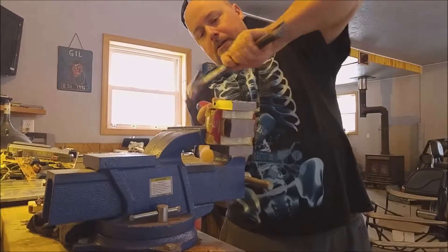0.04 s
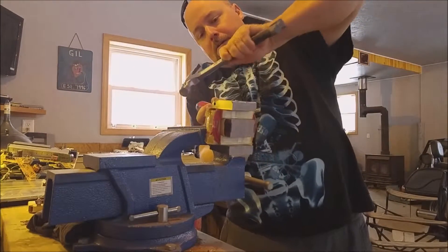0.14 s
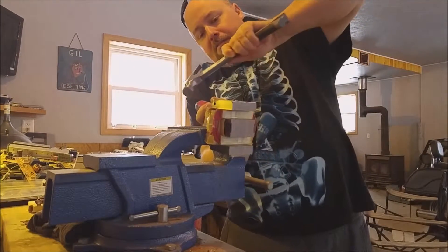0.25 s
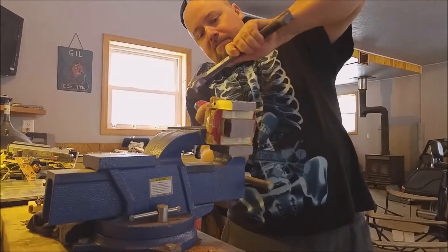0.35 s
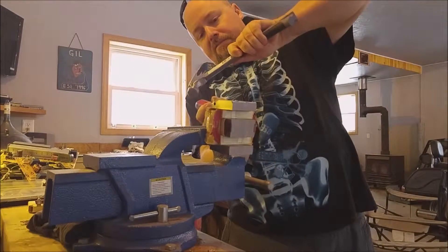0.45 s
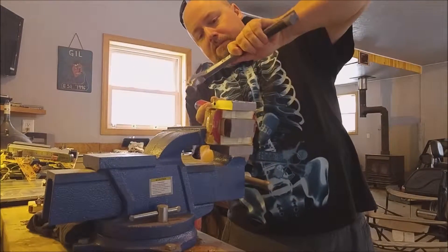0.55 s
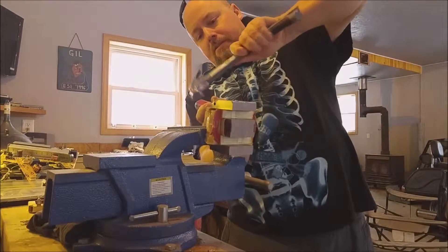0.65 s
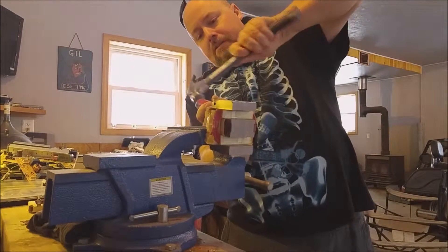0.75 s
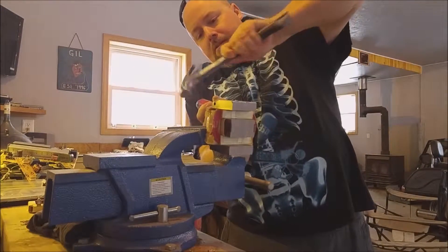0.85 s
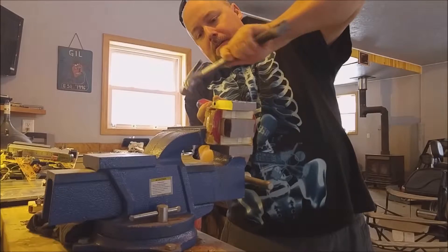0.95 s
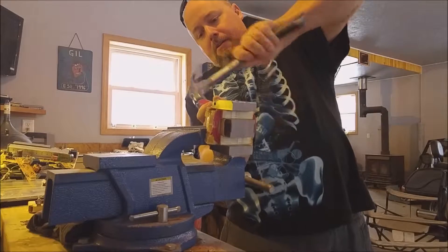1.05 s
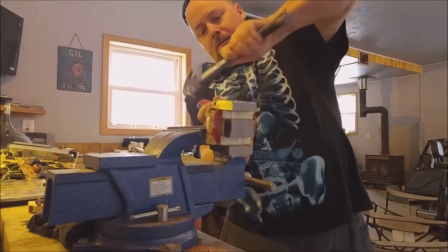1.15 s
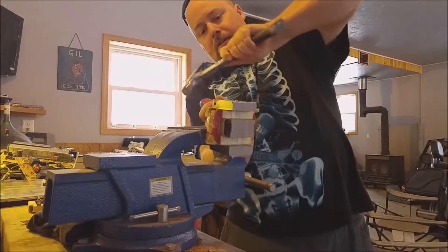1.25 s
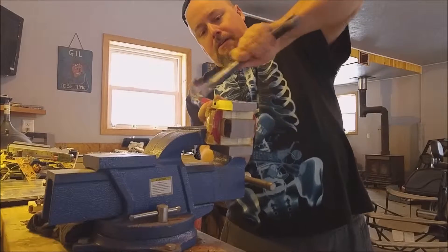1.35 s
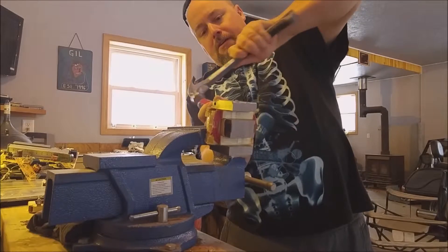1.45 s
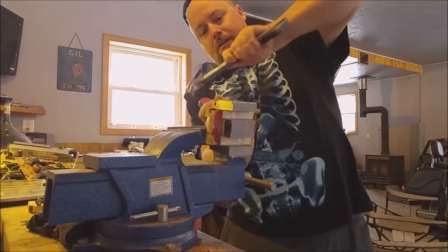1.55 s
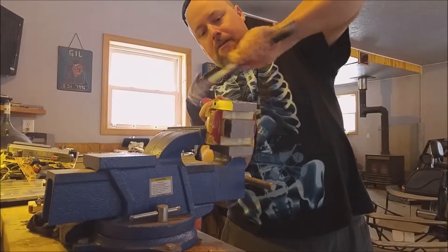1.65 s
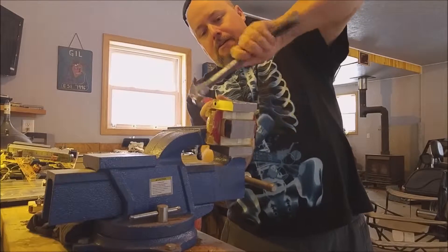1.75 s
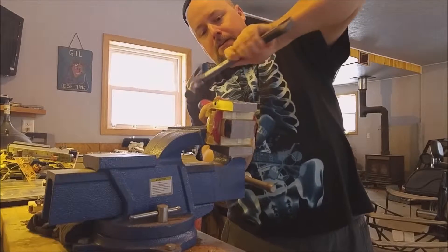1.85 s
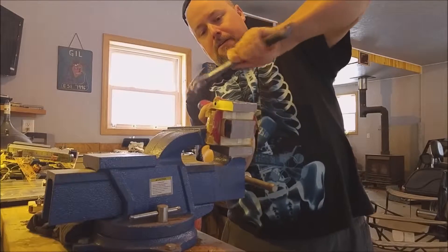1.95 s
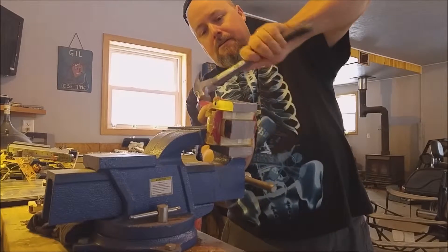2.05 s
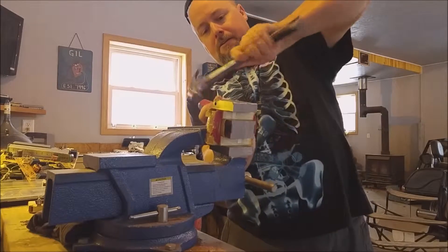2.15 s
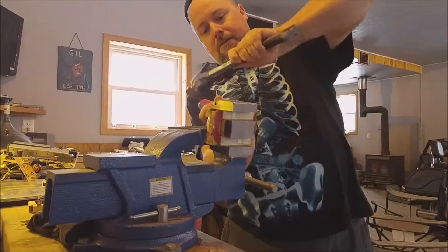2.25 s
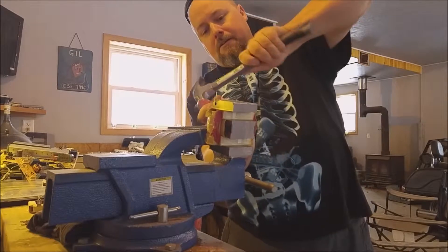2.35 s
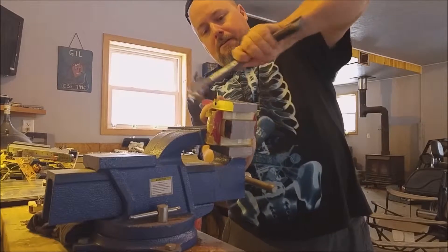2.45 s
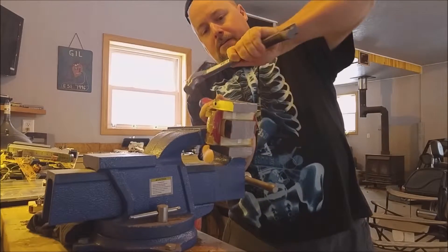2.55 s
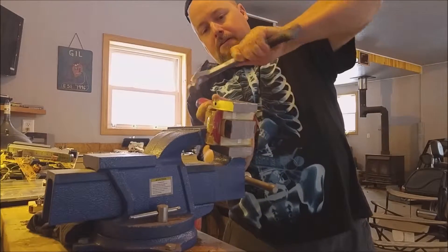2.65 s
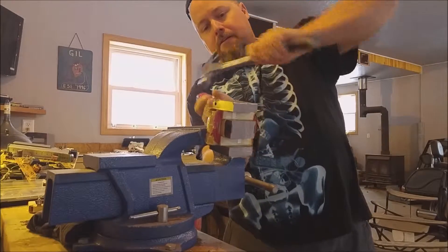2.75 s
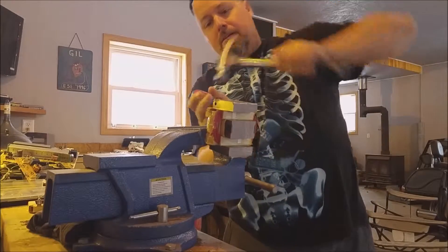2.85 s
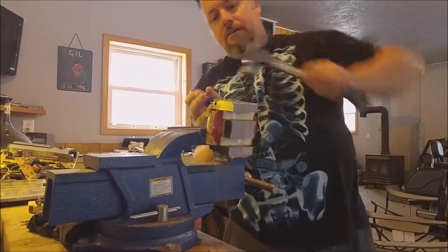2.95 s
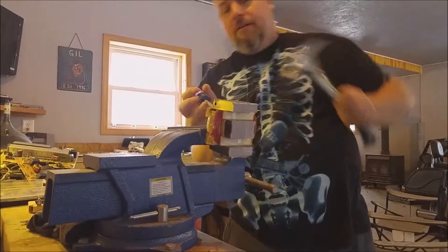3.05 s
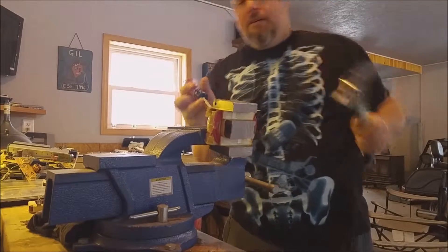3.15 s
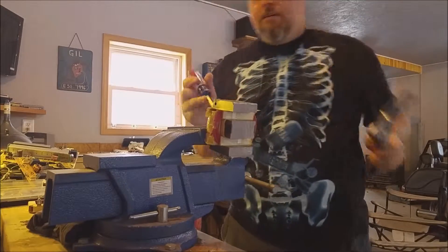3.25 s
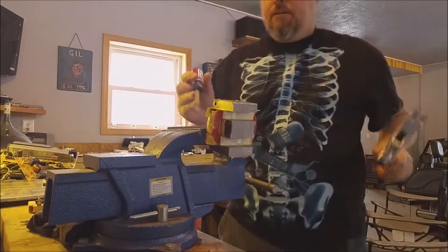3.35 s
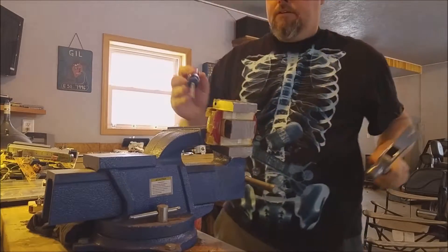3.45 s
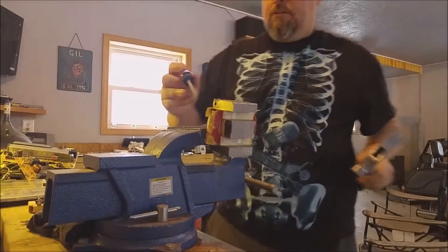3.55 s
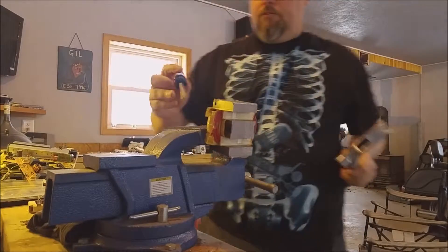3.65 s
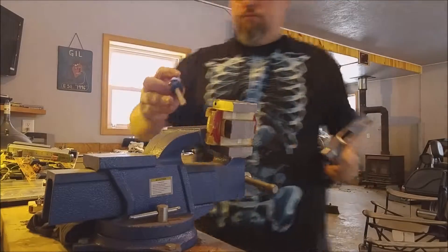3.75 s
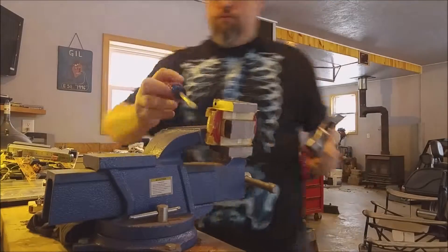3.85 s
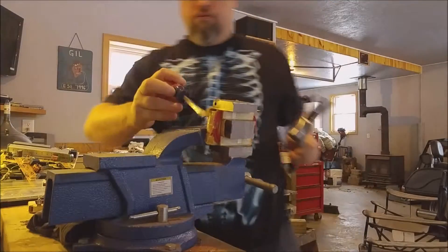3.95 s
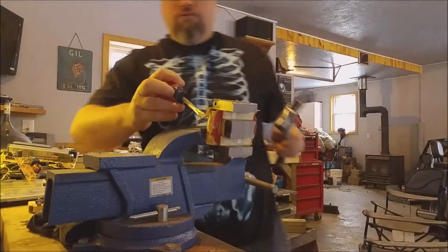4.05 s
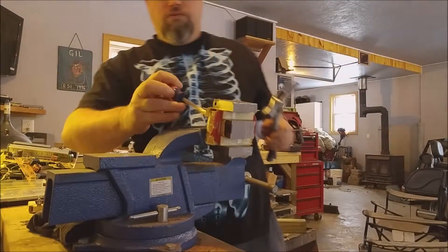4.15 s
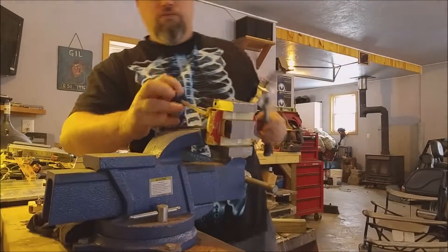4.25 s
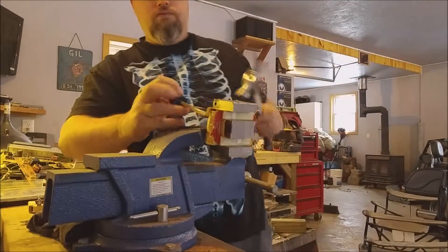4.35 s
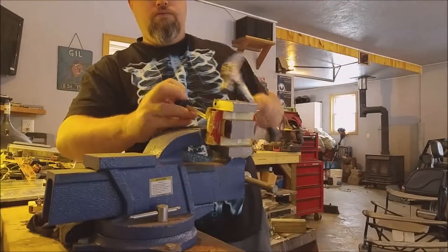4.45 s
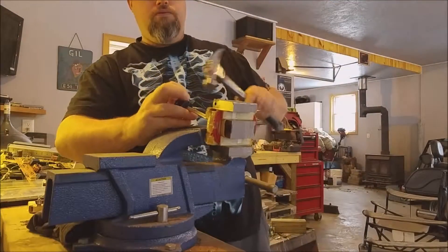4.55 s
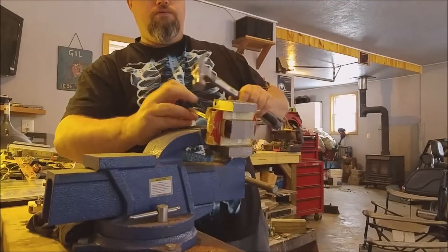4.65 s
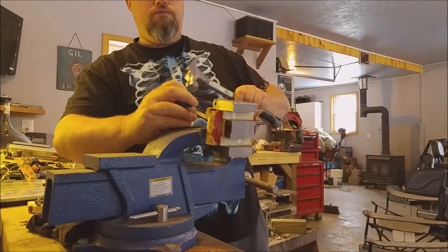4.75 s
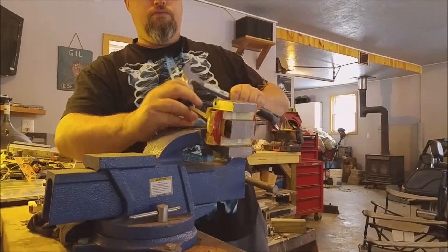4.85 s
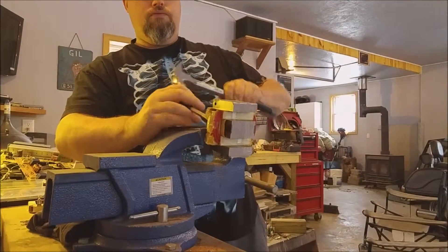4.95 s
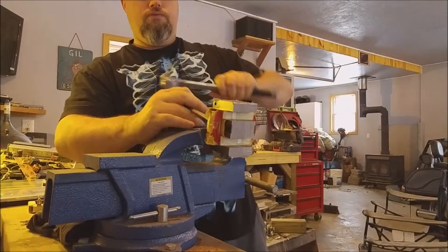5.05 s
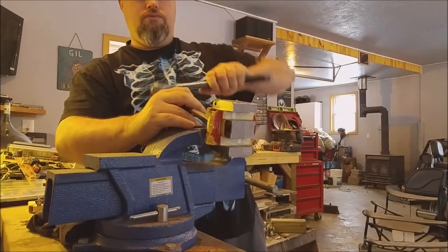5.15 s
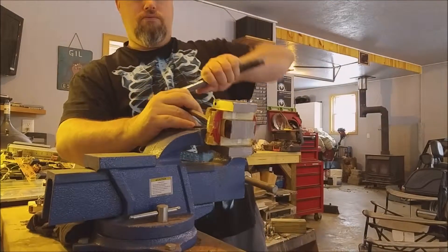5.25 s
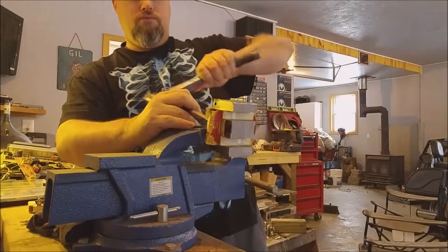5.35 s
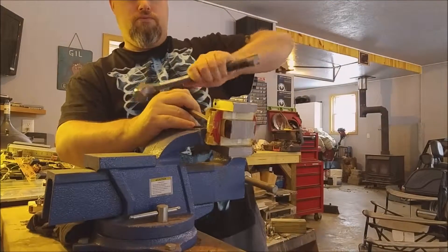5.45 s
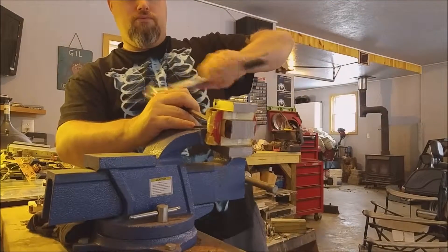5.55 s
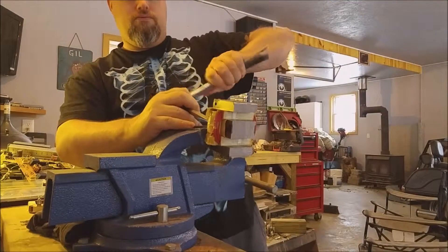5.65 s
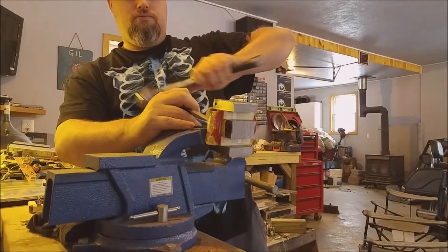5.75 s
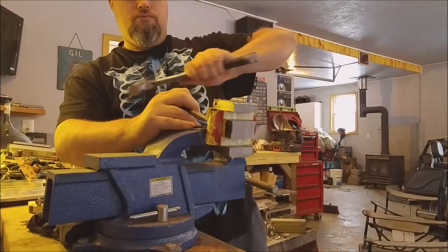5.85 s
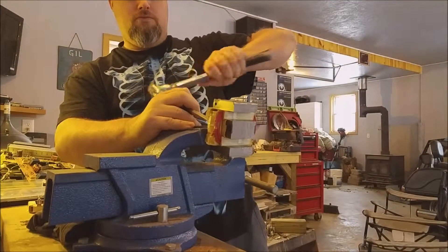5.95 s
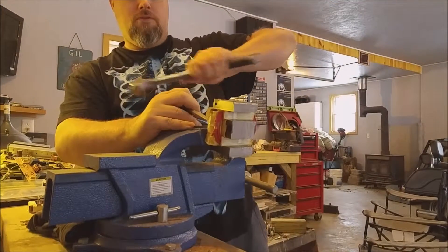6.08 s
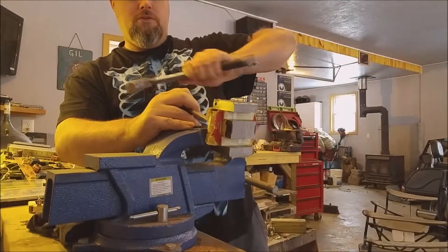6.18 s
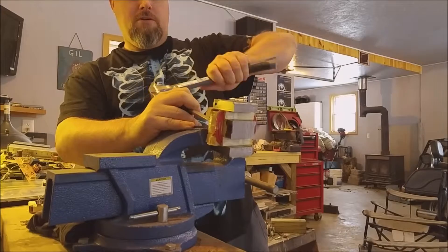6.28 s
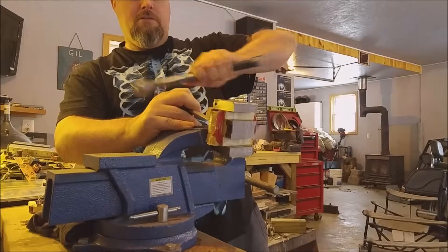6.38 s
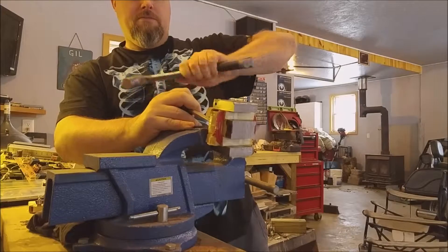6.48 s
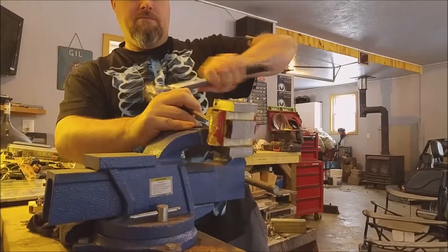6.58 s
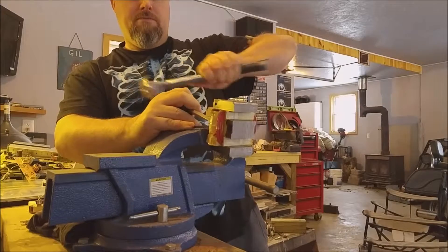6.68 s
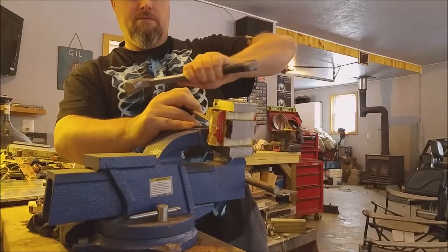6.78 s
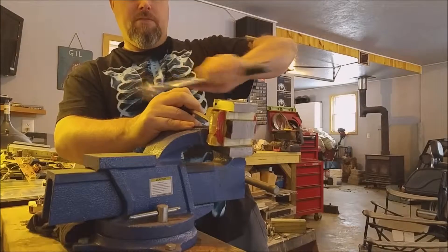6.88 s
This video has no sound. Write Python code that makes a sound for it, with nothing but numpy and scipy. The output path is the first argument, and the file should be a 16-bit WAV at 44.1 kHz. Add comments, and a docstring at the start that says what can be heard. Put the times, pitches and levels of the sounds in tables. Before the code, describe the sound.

A hammer strikes a screwdriver against clamped steel in two runs of sharp, ringing blows, echoing in a workshop.

```python
"""A hammer drives a screwdriver against a coil in a steel core, clamped in a vise on a wooden bench.
Each blow cracks, rings the steel, thumps the bench and fills the workshop; the hammer often bounces once.
Between two runs of blows the worker steps round the vise, and the blade clicks into a new place.
Rings are fading sine waves; cracks, clicks and echoes are fading noise. Faint air and hum lie behind."""
import sys
import numpy as np
from scipy import signal
from scipy.fft import rfft, irfft
from scipy.io import wavfile
from scipy.ndimage import uniform_filter1d

SR = 44100
rng = np.random.default_rng(int(sys.argv[2]) if len(sys.argv) > 2 else 0)


def to_wav(s):
    """Save 16-bit WAV."""
    ch = np.atleast_2d(s).T  # columns
    pcm = np.round(np.clip(ch, -1, 1) * 32767)  # PCM
    wavfile.write(sys.argv[1], SR, pcm.astype(np.int16))


N = 305172
T = np.arange(SR) / SR  # one second of time
HZ = np.fft.rfftfreq(SR, 1 / SR)  # the frequencies in that second, 1 Hz apart

# hammer blows: t/s, force/dB, bass thump/dB, wooden knock/dB, treble crack/dB, ring f/Hz, ring level/dB
BLOWS = [(0.056, -6, -1, 6, -5, 654, -18), (0.893, -7.5, 5.5, 7, -4.5, 1223, -11),
         (1.22, -1, 1.5, 3, -2, 2570, -28), (1.554, -3.5, 0.5, 3.5, -6.5, 1205, -24),
         (1.873, -3.5, 1.5, 3, -2.5, 1186, -39), (2.21, -4.5, 2, 2.5, -6.5, 654, -26),
         (2.537, -4.5, 0, 2.5, -4.5, 663, -24), (5.776, -7.5, 2.5, 2, 6.5, 656, -10),
         (6.143, -6, 5, 1.5, 2.5, 870, -19), (6.475, -4.5, 5, 2, 2, 689, -19.5),
         (6.798, -5.5, 6, 4, -4, 666, -20)]
# how long the room echoes (t60 is the time to fade by 60 dB): f/Hz, t60/s
ROOM_T60 = [(70, 0.78), (200, 0.54), (400, .66), (650, .76), (1100, 0.78), (3000, 0.72), (7000, 0.63),
            (14000, 0.35)]
# how alike left and right are in the direct sound: f/Hz, likeness/0-1
NEAR_SAME = [(100, .85), (300, 0.75), (600, 0.4), (1100, .15), (7000, 0.1)]
# how alike they are in the room's sound: f/Hz, likeness/0-1
ROOM_SAME = [(80, .9), (300, .78), (600, 0.22), (1100, 0.05), (7000, 0.05)]
# noise that is equally strong at every pitch: f/Hz, level/dB
WHITE = [(20, 0), (20000, 0)]


def hammer():
    """Each blow snaps, clanks the stacked core and rings its steel; vise, bench and room answer."""
    # tone colour of the clank: f/Hz, level/dB
    clank_colour = [(35, -45.5), (60, -24), (176, -19), (354, -11.5), (540, -12.5), (682, -9), (946, -7),
                    (1060, -8), (1340, -16.5), (1620, -9.5), (1820, -16), (2520, -20.5), (3420, -26),
                    (8320, -19.5), (16000, -37.5)]
    # how long the clank lasts: f/Hz, t60/s
    clank_t60 = [(100, 0.23), (350, 0.18), (1000, 0.14), (2700, 0.049), (7000, 0.09), (14000, 0.076)]
    # tones of the steel core: f/Hz, level/dB, t60/s
    steel_tones = [(656.4, -10, 0.13), (860, -17.5, 0.033), (1079, -9, 0.16), (1191, 4, 0.043),
                   (1560, -1.5, 0.066), (2576, -26, 0.43), (3390, -24.5, 0.31), (6220, -6.5, 0.02),
                   (7330, -12, 0.078), (8200, -18.5, 0.13)]
    # tones of the heavy vise, which is slow to get moving: f/Hz, level/dB, t60/s
    vise_tones = [(165.7, -12, .15), (265, -6, 0.15), (332, -6, .1), (387.6, 2.5, 0.12)]
    out = np.zeros((2, N))
    for s, force_db, thump_db, knock_db, crack_db, _, _ in BLOWS:
        clank = fade(noise(clank_colour, NEAR_SAME, SR), clank_t60) * rise(0.00011)
        snap = amp(-20) * contact(t60=0.042) + amp(-12.5) * contact(t60=0.029)
        blow = amp(-14) * clank + snap * pan(2.2)
        blow += amp(-16.5) * ring(steel_tones, detune=0.0036) * rise(0.00088)
        blow += amp(-17) * ring(vise_tones, detune=0.018) * slow_rise(0.009)
        blow += amp(-31.5) * bench()
        blow += amp(-24.5) * workshop() * pan(0.51)
        blow += amp(-46.5) * jolt()
        add(out, s, amp(force_db) * tint(blow, [thump_db, knock_db, 0, 0, crack_db]))
    # an earlier blow still hangs in the room
    add(out, -0.3, amp(-20) * tint(workshop(), [-3.5, -1, -5.5, -6.5, -14]))
    return out


def contact(t60):
    """Steel meets steel with a bright snap."""
    # tone colour of the snap: f/Hz, level/dB
    snap_colour = [(180, -53.5), (300, -27), (1230, -19.5), (2030, -23.5), (4670, -6.5), (5430, -9.5),
                   (5900, 2.5), (6620, 0.5), (7080, 0.5), (8640, -6), (10200, -11), (15200, -24.5),
                   (16000, -38)]
    return ragged(noise(snap_colour, NEAR_SAME, SR), spacing_hz=410) * dying(t60) * rise(0.00012)


def core_and_shaft(pair_ratio=0.905, lower_db=-3.5, smear_hz=60):
    """The core rings with two close tones where the blade bites; the shaft pings if hit off centre."""
    # pings of the screwdriver shaft: t/s, f/Hz, level/dB, t60/s
    pings = [(0.893, 6000, -31, 0.041), (1.241, 8070, -27.5, 0.29), (1.555, 6380, -17.5, 0.02),
             (1.871, 6160, -30.5, 0.072), (5.776, 7300, -33, 0.025)]
    core, shaft = np.zeros((2, 2, N))
    for s, force_db, *_, hz, ring_db in BLOWS:
        t60 = 0.16 * (hz / 1000) ** -0.46  # higher rings die sooner
        lower_hz = hz * pair_ratio
        pair = ring([(hz, 0, t60), (lower_hz, lower_db, t60)], detune=0) * rise(0.00031)
        # the loose coil smears the ring in the room
        smear = resonant([(hz, smear_hz, 0), (lower_hz, smear_hz, lower_db)]) * dying(0.85) * rise(0.015)
        add(core, s, amp(force_db + ring_db) * (pair + amp(-12.5) * smear))
    for s, *tone in pings:
        add(shaft, s, ring([tone], detune=0) * rise(0.0007))
    return core + shaft + amp(-3) * echo(shaft)


def bench(lag_s=0.025, rebound_s=0.09):
    """The bench bends a moment after the blow, then rocks back."""
    # tones of the bench and floor: f/Hz, level/dB, t60/s
    bench_tones = [(57.3, -4, 0.27), (68.7, -15.5, 0.28), (87.5, 7.5, 0.22), (128.3, -11.5, .3)]
    thump = ring(bench_tones, detune=0.02) * slow_rise(lag_s) * pan(4)
    sway = np.sin(2 * np.pi * 68 * (T - rebound_s)) * np.exp(-((T - rebound_s - 0.012) / 0.015) ** 2)
    return thump + amp(3.5) * sway


def jolt():
    """A deep bump follows each blow, mostly on the left."""
    colour = [(15, -41.5), (38, 5), (60, 4), (110, -8.5), (300, -49), (1000, -87.5)]
    return noise(colour, [(30, 0.3), (100, 0.46)], SR) * dying(0.6) * slow_rise(0.015) * pan(10)


def thuds(second_run_s=5, drop_db_per_blow=9):
    """From its new place the blade drives squarely into the bench; thuds weaken as the core settles."""
    # tones of the bench top: f/Hz, level/dB, t60/s
    top_tones = [(56, 3, 0.12), (112, 5, 0.077)]
    out = np.zeros((2, N))
    for k, s in enumerate(row[0] for row in BLOWS if row[0] > second_run_s):
        dip = ring(top_tones, detune=0.032, apart_hz=90) * rise(0.0043) * pan(10)
        add(out, s, amp(-19 - k * drop_db_per_blow) * dip)
    return out


def bounces():
    """The hammer head lands a second time: a thin, bright chink that the room soon dulls."""
    # bounces on the handle: t/s, level/dB
    landings = [(0.1333, -40), (1.5844, -20.5), (1.9083, -24.5), (2.2416, -24.5), (2.5712, -27.5),
                (6.51, -26.5), (6.83, -25)]
    # pitches that stand out in a bounce: f/Hz, width/Hz, level/dB
    handle_peaks = [(6960, 2600, -12.5), (8400, 310, 3.5), (11500, 600, -18.5), (13180, 700, -9)]
    out = np.zeros((2, N))
    for s, db in landings:
        chink = resonant(handle_peaks) * dying(0.073) * rise(0.00054)
        tail = fade(resonant(handle_peaks), [(7000, 0.45), (9000, 0.35), (13000, 0.18)]) * rise(0.004)
        add(out, s, amp(db - 2.5) * (chink + amp(-15.5) * tail) * pan(0.75))
    return out


def blade():
    """The blade finds its place with small clicks that nudge the bench, and skids with a gritty rasp."""
    # clicks of the blade: t/s, level/dB
    clicks = [(4.375, -18.5), (4.3973, -24.5), (4.653, -17.5), (4.6723, -24), (4.6829, -31), (4.689, -34)]
    # pitches that stand out in a click: f/Hz, width/Hz, level/dB
    blade_peaks = [(720, 160, -13), (1207, 39, -6.5), (4400, 1200, -14), (6420, 440, -7), (7180, 260, -2),
                   (8000, 150, 4), (8680, 490, -2.5), (11400, 2500, -20), (14900, 1400, -33)]
    # skids over the metal: t/s, level/dB, swell time/s
    skids = [(0.14, -44, 0.015), (1.239, -28, .008), (1.259, -24.5, 0.011), (4.369, -45, .005),
             (4.434, -45, 0.042), (4.672, -51, 0.022), (5.786, -27, 0.0089)]
    nudge_colour = [(40, -10), (110, 3), (220, -2), (400, -4), (900, -30), (3000, -70)]
    rasp_colour = [(500, -7), (2500, 2.5), (4800, 4), (7500, 5), (9000, -1.5), (11000, 0.5),
                   (16000, -22.5)]
    tick_then_ring = amp(2.5) * dying(0.011) + amp(-15) * dying(0.06)
    out = np.zeros((2, N))
    for s, db in clicks:
        click = resonant(blade_peaks) * tick_then_ring * rise(0.0005)
        add(out, s, amp(db) * (click * pan(5) + amp(-36) * workshop()))
        nudge = noise(nudge_colour, ROOM_SAME, SR) * dying(0.5) * rise(0.015)
        add(out, s, amp(db - 42) * nudge)
    for s, db, swell_s in skids:
        grit = unit(np.exp(1.5 * uniform_filter1d(rng.standard_normal(SR), 20)))
        rasp = noise(rasp_colour, NEAR_SAME, SR)
        swell = np.exp(-((T - 0.5) / swell_s) ** 2)
        add(out, s - 0.5, amp(db) * rasp * grit * swell * pan(2))
    return out + amp(-10) * echo(out)


def workshop():
    """The room answers a sharp sound with a wash of noise in which steel tones stand out."""
    # tone colour of the wash: f/Hz, level/dB
    wash_colour = [(40, -15.5), (75, -0.5), (190, -6.5), (350, 1.5), (440, -1.5), (515, -11.5), (640, -4.5),
                   (1150, -5.5), (2000, -17.5), (4200, -19), (7000, -10.5), (9000, -17), (11500, -21),
                   (16000, -38.5)]
    # steel tones that hang in the room: f/Hz, width/Hz, lift/dB
    held_tones = [(627, 26, 6.5), (1130, 19, 0), (1704, 42, 4), (2530, 55, 1), (2791, 30, 4.5),
                  (3500, 25, 3), (6530, 60, 3), (7000, 140, 3), (8500, 180, 5.5)]
    lift_db = sum(db / (1 + ((HZ - hz) / width) ** 2) for hz, width, db in held_tones)
    wash = irfft(rfft(noise(wash_colour, ROOM_SAME, SR)) * amp(lift_db), SR)
    return fade(ragged(wash, spacing_hz=90), ROOM_T60) * rise(0.016)


def echo(x):
    """The room's many reflections blur any sound into a fading tail."""
    room = fade(noise(WHITE, ROOM_SAME, SR), ROOM_T60) * rise(0.037)
    return signal.fftconvolve(x, room / np.linalg.norm(room[0]), axes=1)[:, :N]


def steps(loudest_s=4.25, swell_s=0.65):
    """The floor gives one low, swelling rumble as the worker steps round the vise."""
    swell = np.exp(-((np.arange(N) / SR - loudest_s) / swell_s) ** 2)
    rumble = noise([(18, -25), (50, 0), (120, -6), (250, -14), (500, -35), (1500, -80)], ROOM_SAME, N)
    return amp(-71) * swell * rumble * pan(2)


def background(tick_s=0.001):
    """Room air, a faint hum, and a short run of tiny electrical ticks at an even pace."""
    # tone colour of the air: f/Hz, level/dB
    air_colour = [(18, -29.5), (45, -1), (90, -7), (140, -11), (290, -19), (415, -9), (510, -24),
                  (650, -14), (1200, -21), (2400, -26.5), (4200, -24), (8300, -19.5), (10500, -28),
                  (16000, -36)]
    # tones of the hum: f/Hz, level/dB
    hum_tones = [(53.8, -93.5), (419.9, -83), (608.3, -90)]
    t = np.arange(N) / SR
    out = amp(-73.3) * noise(air_colour, ROOM_SAME, N) * pan(15)
    for hz, db in hum_tones:
        waver = np.cumsum(rng.standard_normal(N)) * 0.0043
        out += amp(db) * np.sqrt(2) * np.sin(2 * np.pi * hz * t + waver)
    for s in np.arange(2.9615, 3.6, 0.1024):
        tick = noise([(4000, -30), (6500, 0), (10000, -3), (16000, -13)], [(100, 0.8), (9000, 0.8)], 1024)
        add(out, s, amp(-55) * tick * np.exp(-T[:1024] / tick_s))
    return out


def ring(tones, detune, apart_hz=600):
    """A struck object's fading tones; the higher ones are more out of step between left and right."""
    out = np.zeros((2, SR))
    for hz, db, t60 in tones:
        mistune, offset = rng.standard_normal(2)
        phase = np.array([[0.5], [-0.5]]) * offset * min(hz / apart_hz, np.pi)
        out += amp(db) * dying(t60) * np.sin(2 * np.pi * hz * (1 + detune * mistune) * T + phase)
    return out


def noise(colour, same, size):
    """Stereo noise with a tone colour (f/Hz, level/dB) and a left-right likeness (f/Hz, likeness/0-1)."""
    hz = np.fft.rfftfreq(size, 1 / SR)
    left, other = rfft(rng.standard_normal((2, size)))
    likeness = np.clip(read(same, hz), -1, 1)
    right = likeness * left + np.sqrt(1 - likeness ** 2) * other
    return unit(irfft(np.array([left, right]) * amp(read(colour, hz)), size))


def resonant(peaks):
    """Noise that is strong around a few pitches."""
    gain = np.sqrt(sum(amp(db) ** 2 / (1 + ((HZ - hz) / width) ** 2) ** 2 for hz, width, db in peaks))
    return unit(irfft(rfft(noise(WHITE, NEAR_SAME, SR)) * gain, SR))


def ragged(x, spacing_hz):
    """The stacked core's many weak tones boost a sound unevenly from pitch to pitch."""
    ripple = uniform_filter1d(rng.standard_normal(len(HZ)), spacing_hz)
    ripple = unit(uniform_filter1d(ripple, spacing_hz))
    ripple_db = 2.4 * ripple * np.clip(HZ / 1500, 0, 1)
    return irfft(rfft(x) * amp(ripple_db + 3.58), SR)


def fade(x, t60s):
    """Each band of pitches dies away at its own speed."""
    spectrum, centres = rfft(x), np.geomspace(60, 15000, 12)
    out = np.zeros_like(x)
    for hz, band in zip(centres, np.eye(len(centres))):
        share = np.interp(np.log(HZ + 1), np.log(centres), band)
        out += irfft(spectrum * share, SR) * dying(read(t60s, hz))
    return out


def tint(x, dbs):
    """Sets how one blow shares its energy from bass to treble."""
    # where the five gains in dbs act: f/Hz
    band_hz = [80, 280, 800, 2700, 7500]
    log_gain = np.log(amp(read(list(zip(band_hz, dbs)), abs(np.fft.fftfreq(SR, 1 / SR)))))
    response = np.exp(np.conj(signal.hilbert(log_gain)))[:len(HZ)]  # nothing sounds before the blow
    return signal.oaconvolve(x, irfft(response, SR)[None, :SR // 20], axes=1)[:, :SR]


def dying(t60):
    return np.exp(-np.log(1000) * T / t60)


def rise(seconds):
    return 1 - np.exp(-T / seconds)


def slow_rise(seconds):
    """The slow start of something heavy."""
    return 1 - np.exp(-(T / seconds) ** 3)


def amp(db):
    return 10 ** (np.asarray(db) / 20)


def pan(left_db):
    return amp([[left_db / 2], [-left_db / 2]])


def unit(x):
    """Scales a signal to an average power of 1."""
    return x / np.sqrt(np.mean(x ** 2) + 1e-20)


def read(points, hz):
    """Looks up values between the rows of a table (f/Hz, value), with octaves evenly spaced."""
    f, value = np.transpose(points)
    return np.interp(np.log(hz + 1), np.log(f + 1), value)


def add(mix, s, sound):
    """Mixes a sound in at s seconds."""
    start = round(s * SR)
    sound = sound[..., max(-start, 0):]
    part = mix[:, max(start, 0):][:, :sound.shape[-1]]
    part += sound[..., :part.shape[1]]


def scene():
    """Everything at the bench, left and right."""
    return hammer() + core_and_shaft() + thuds() + bounces() + blade() + steps() + background()


def record(dry, ceiling=0.39, top_hz=16300):
    """Makes the left a little louder, rounds off the loudest peaks and cuts the highest treble."""
    rounded = ceiling * np.tanh(dry * pan(0.98) / ceiling)
    treble_cut = signal.firwin(255, top_hz, window=("kaiser", 9), fs=SR)
    return signal.oaconvolve(rounded, treble_cut[None], "same")


dry = scene()
out = record(dry)
to_wav(out)
```